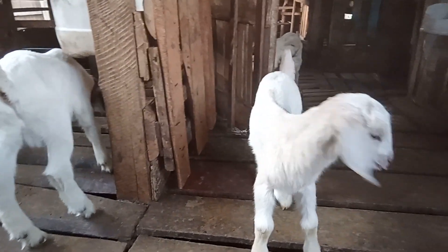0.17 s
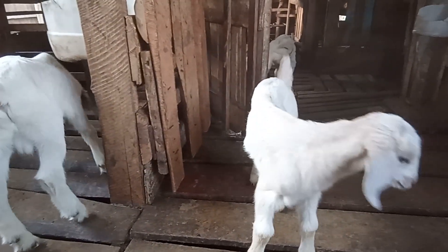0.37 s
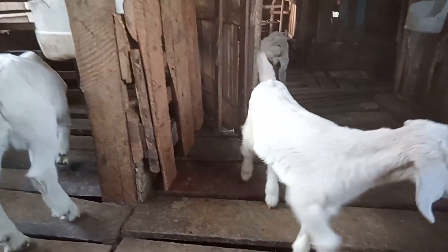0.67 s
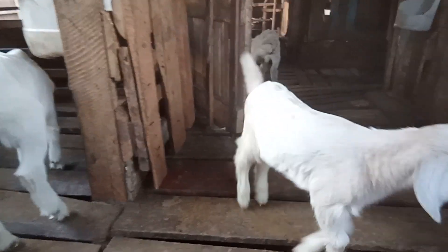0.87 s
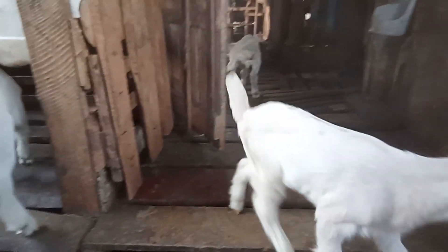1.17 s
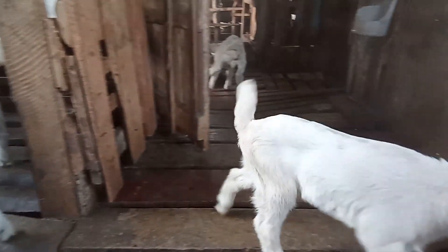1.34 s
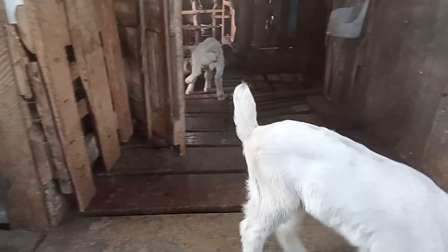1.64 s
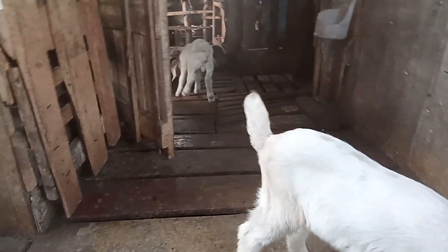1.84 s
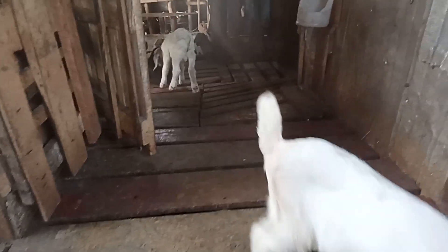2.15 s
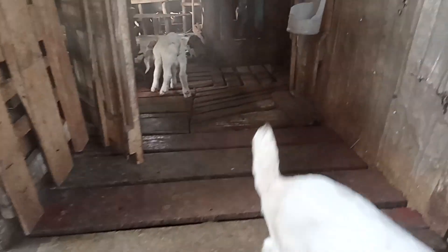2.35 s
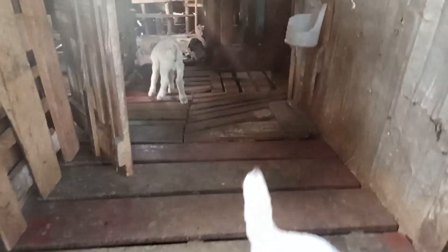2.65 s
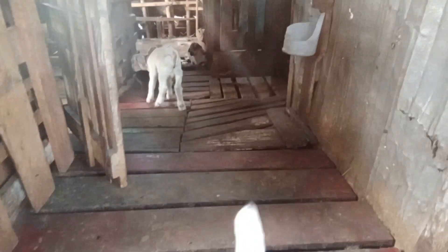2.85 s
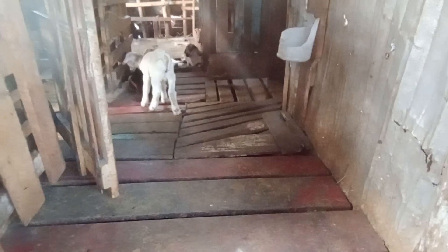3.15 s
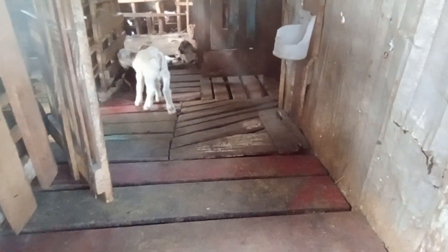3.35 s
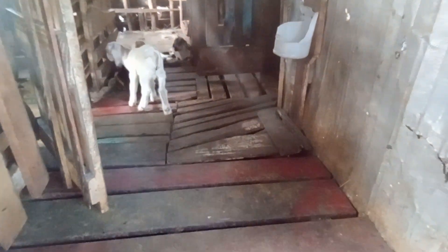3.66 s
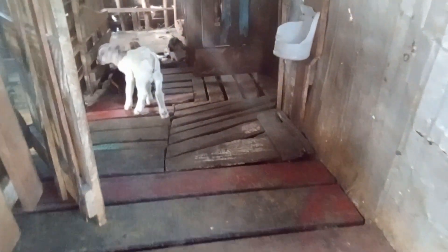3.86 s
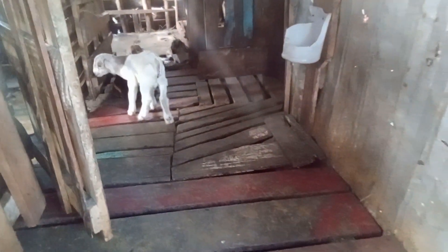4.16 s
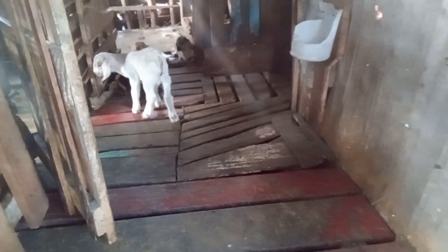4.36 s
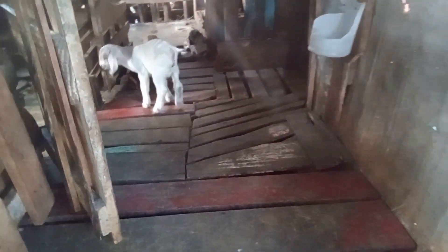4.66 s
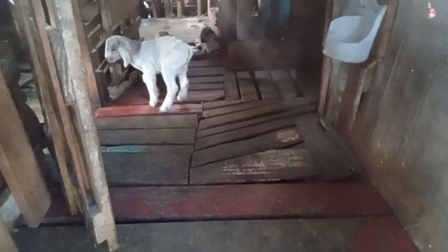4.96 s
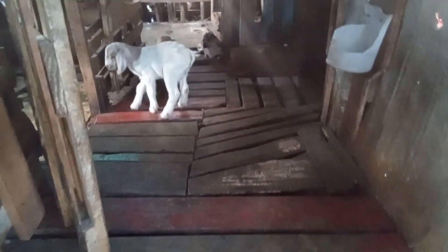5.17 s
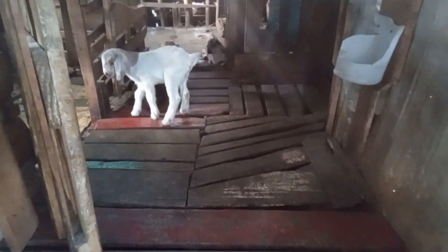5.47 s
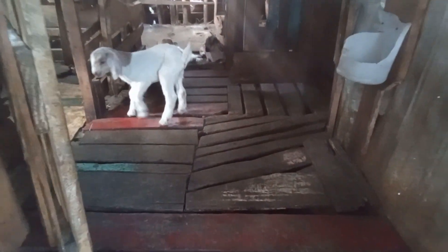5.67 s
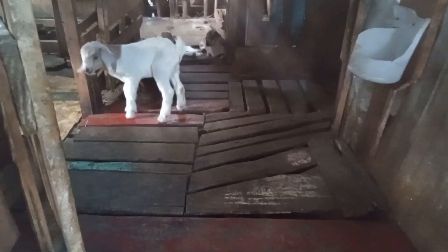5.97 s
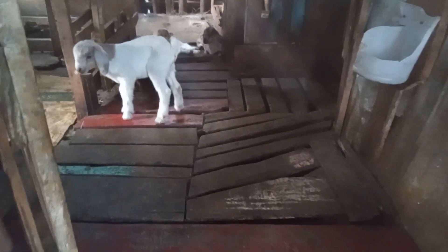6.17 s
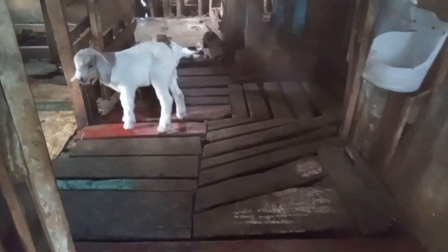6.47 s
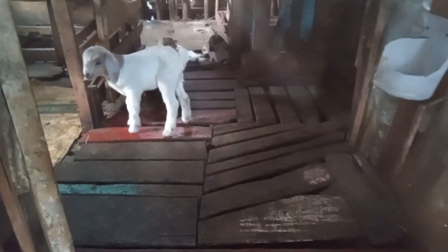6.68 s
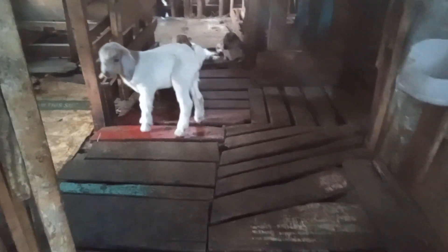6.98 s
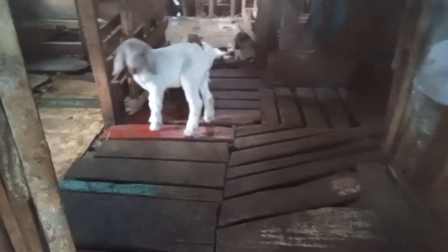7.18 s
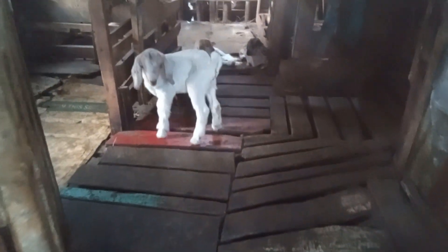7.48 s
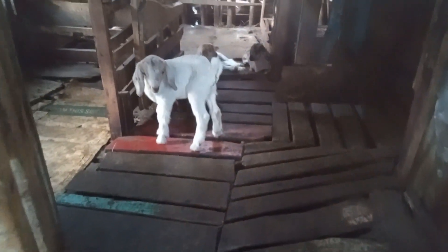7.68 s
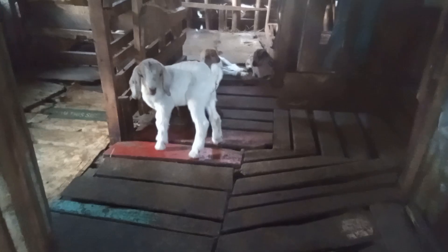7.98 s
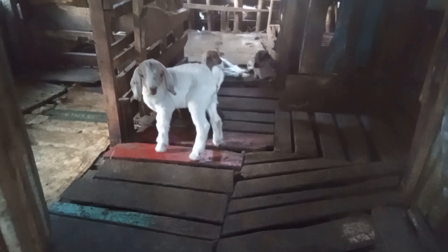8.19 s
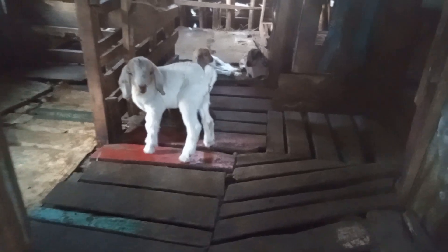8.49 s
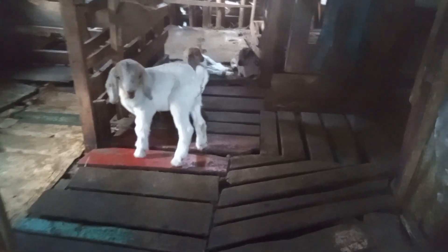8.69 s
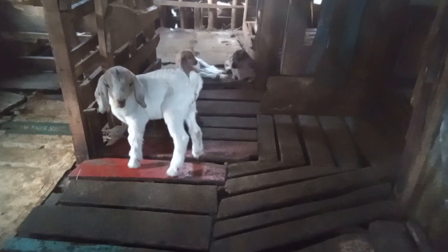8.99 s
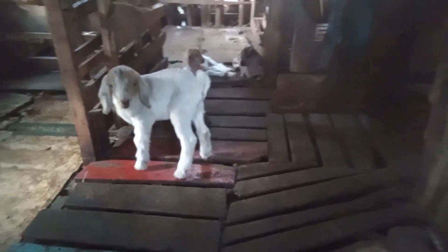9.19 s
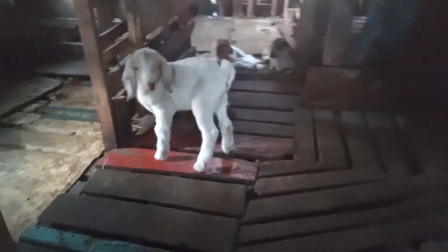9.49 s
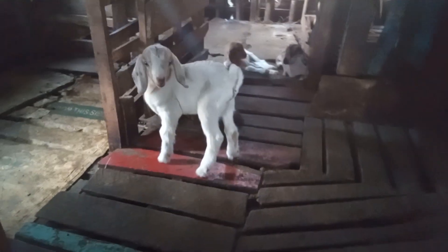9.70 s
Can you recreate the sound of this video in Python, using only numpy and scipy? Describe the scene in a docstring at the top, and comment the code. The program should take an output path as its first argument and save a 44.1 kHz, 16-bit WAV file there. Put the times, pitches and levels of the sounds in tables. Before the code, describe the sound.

Close single-channel pickup of small hooves on a slatted wooden floor. Light ticks and a few firm clacks lead to a fast run of dry, sharp taps, loudest around the middle. Afterwards steps become uneven, with low pallet thumps, short rasping slides and a last small cluster of clicks. Behind lie a soft rumble, faint hum and thin insect-like hiss in a small barn.

```python
"""Goats on loose pallets

Young goats walk about on loose wooden pallets in a small plank barn. Taps are sharp pulses that ring
slat and pallet modes, with a short tail of decaying noise bands. Thuds strike the low modes three times.
Scuffs are swells of uneven grit; squeaks, short rasps and one 2 kHz knock are narrow to wide noise at a
steady or gliding pitch. Behind them: a low rumble, a faint hum and a thin insect-like hiss."""
import sys
import numpy as np
from scipy import signal
from scipy.fft import rfft, irfft, next_fast_len
from scipy.io import wavfile

SR = 44100
rng = np.random.default_rng(int(sys.argv[2]) if len(sys.argv) > 2 else 0)


def generate_wav(signal):
    """Clip the signal to [-1, 1] and save it as 16-bit WAV at the path in sys.argv[1]."""
    frames = np.transpose(np.atleast_2d(signal))
    scaled = np.clip(frames, -1, 1) * 32767
    pcm = np.round(scaled).astype(np.int16)
    wavfile.write(sys.argv[1], SR, pcm)


def nominal_scale(level):
    """Amplitude ratio for a level in decibels (scalar or array-like)."""
    x = np.asarray(level, float) / 20
    return 10 ** x


N = 434385  # samples

# hoof taps: (time [s], nominal level [dB], pallet boom re level [dB], slat knock re level [dB],
# hardness [dB/octave])
TAPS = [(0.004, -34, -37, -37, 0), (0.011, -35, -37, -42, -1.5), (0.022, -31, -37, -35, 0),
        (0.442, -57.5, -21, -27, 14), (0.693, -34, -22, -25, -6.5), (0.844, -43.5, -18, -11, -4),
        (0.872, -45.5, -18, -3, 9), (1.069, -72, -30, -40, 18), (1.148, -36.5, -16, -15, -7.5),
        (1.242, -21, -29, -19.5, -3), (1.383, -17.5, -29, -18, -1.5), (1.571, -16.5, -17.5, -14.5, 1.5),
        (1.694, -34, -14, -13.5, -8), (1.931, -20.5, -25, -22.5, -2), (2.048, -44.5, -30, -27, 14),
        (2.279, -34.5, -35, -11, -2), (2.318, -41, -31, -15, -7.5), (2.606, -51, -18, -12, 5),
        (2.841, -39, -16, -21, -6), (2.918, -32, -31, -36, 2.5), (3.075, -19, -35, -32, -2.5),
        (3.225, -34.5, -16, -32, 6), (3.254, -19.5, -27, -38, 0.5), (3.318, -21.5, -24, -36, -2.5),
        (3.345, -21, -11, -21, -2.5), (3.363, -19, -16, -6.5, -8), (3.513, -38, -36, -30, 4),
        (3.528, -13, -49, -33, 1), (3.54, -20.5, -29, -32, -3.5), (3.567, -15, -21, -35, -2.5),
        (3.633, -15.5, -27, -27, -1.5), (3.68, -13.5, -29, -31, -0.5), (3.71, -16.5, -32, -34, -3),
        (3.74, -18.5, -21, -24, -3), (3.78, -12.5, -31, -31, -2), (3.819, -12.5, -26.5, -40, -1.5),
        (3.867, -14.5, -29, -32, -2), (3.934, -20.5, -22, -25, -4), (4.062, -10, -29, -42, -1),
        (4.129, -11, -27, -42, -1), (4.177, -12.5, -30, -30, -1), (4.253, -16, -28, -37, -4),
        (4.279, -10.5, -26, -35, -0.5), (4.367, -8.5, -32.5, -33, -0.5), (4.385, -8, -37, -33, -1.5),
        (4.545, -33.5, -16, 2, -9.5), (4.615, -10.5, -26, -24, -1), (4.644, -7, -26, -28, 0),
        (4.784, -13, -8, -2.5, -1.5), (4.965, -17, -10.5, -16, -3), (5.088, -34.5, -16, -14, 1.5),
        (5.177, -21, -22.5, -17.5, -2.5), (5.511, -29.5, -17, -30, 8.5), (5.564, -9, -31, -27, -0.5),
        (5.583, -9, -32, -38, -0.5), (5.821, -9, -24, -30.5, -0.5), (5.972, -9, -21.5, -32, 0),
        (6.078, -10.5, -30, -30, 0), (6.129, -9, -22, -37, -0.5), (6.276, -38, -7, -28, 1),
        (6.303, -31.5, -30, -21, 0.5), (6.865, -37.5, -17, -9, -3), (7.328, -22.5, -10, -1.5, -3),
        (7.564, -31, -8, -9.5, -3.5), (7.618, -26, -3.5, -7.5, -4), (7.669, -38.5, 2, -14, -3.5),
        (7.784, -17.5, -19, -12, -4.5), (7.945, -18, -17, -21, 0.5), (8.35, -35, -17, -24, -2.5),
        (8.54, -49.5, -22, -32, 6.5), (8.971, -25.5, -16.5, -26, -3), (9.026, -12.5, -25, -21, 1.5),
        (9.177, -16.5, -18.5, -24.5, 0), (9.257, -12.5, -41, -29, 0.5), (9.368, -41.5, 6.5, -7, -3.5),
        (9.411, -26.5, -7, -12.5, 1), (9.516, -48, 6, 9, -9.5), (9.633, -32, -27, -13, -5.5),
        (9.66, -33.5, -11, -10, -2)]
# weight coming down softly: (time of first touch [s], nominal level [dB], knock re level [dB])
THUDS = [(0.77, -49.5, 4), (1.878, -43.5, -10), (2.084, -50.5, 10), (2.209, -46.5, 6.5), (2.791, -47.5, -3),
         (4.517, -38, -7), (5.631, -31, 3.5), (6.877, -37, 2.5), (7.348, -37, 6), (7.412, -32, 5.5),
         (7.626, -50, -8), (7.737, -44, -20), (7.79, -26, -10), (9.149, -43, -6), (9.289, -37.5, 1),
         (9.746, -44.5, 2)]
# hooves sliding on wood: (time of crest [s], swell [s], fade [s], grit level [dB], brightness [dB])
SCUFFS = [(0.014, 0.054, 0.079, -55, -2.5), (0.08, 0.14, 0.24, -54, 6), (0.703, 0.023, 0.093, -49.5, 1.2),
          (0.918, 0.14, .04, -59.5, -2.5), (1.876, 0.046, 0.098, -57.5, 7), (2.0, .05, 0.28, -61, 2),
          (2.086, .025, 0.13, -53, 1), (2.216, 0.13, 0.1, -51, 2.5), (2.284, 0.017, 0.085, -52.5, 0.5),
          (2.88, 0.18, 0.36, -58.5, 8), (2.962, .04, .085, -43.5, 1.8), (3.26, 0.0036, 0.0064, -36, -4),
          (3.282, .02, .055, -35.5, 1), (3.372, .008, 0.048, -44.5, -15), (3.52, 0.2, .03, -53.5, 9.5),
          (3.968, 0.043, 0.05, -42.5, 0.5), (4.224, 0.089, 0.13, -44, -4), (4.3, .01, .05, -59, -2.5),
          (4.35, .045, 0.027, -42.5, 4), (4.551, 0.047, 0.096, -46, -1.5), (4.69, .05, 0.2, -47.5, 1.5),
          (4.77, 0.076, 0.036, -63, 14), (4.825, 0.039, 0.071, -40.5, -2.5), (5.14, 0.041, .06, -58, -7),
          (5.181, 0.039, 0.015, -38.5, 1.5), (5.52, 0.014, 0.089, -34.5, 4),
          (5.764, 0.028, 0.076, -42.5, -4.5), (5.822, 0.007, 0.036, -59, -11), (6.25, .01, 0.015, -57, 8),
          (6.314, 0.088, 0.028, -51, 4.5), (6.795, 0.023, 0.25, -53, .3), (7.006, 0.11, 0.091, -54, 3.5),
          (7.17, 0.0064, 0.071, -51, -0.5), (7.28, 0.1, 0.2, -47.5, 1.7), (7.534, 0.022, 0.04, -42, 2.5),
          (8.022, 0.11, 0.14, -48, 5.5), (8.263, 0.019, .11, -39, 3.3), (8.37, 0.061, 0.095, -53, -1.5),
          (8.872, .04, 0.08, -43.5, 7.1), (9.068, 0.032, 0.066, -33.5, 12), (9.154, 0.027, 0.077, -34.5, 5),
          (9.44, .01, 0.11, -53.5, 1), (9.74, 0.11, 0.18, -62, 0), (9.804, 0.057, 0.047, -48, 3)]
# hoof squeaks, short coloured rasps and one 2 kHz knock:
# (time [s], length [s], first pitch [Hz], last pitch [Hz], width [Hz], level at start [dB])
PITCHED_RUBS = [(0.008, 0.023, 1976, 1910, 350, -45.5), (0.054, 0.21, 2850, 2710, 546, -62),
                (1.994, 0.072, 2600, 2600, 300, -62), (2.808, 0.044, 3070, 3150, 300.4, -55),
                (2.859, 0.18, 3330, 3520, 382, -55), (3.08, .12, 3500, 3400, 303, -72),
                (8.0, .245, 3530, 3660, 300, -58.5), (8.255, .045, 3130, 3020, 253, -48.5),
                (8.256, 0.054, 990, 1002, 500, -45.5), (8.35, .04, 1854, 1860, 499, -57),
                (8.854, 0.044, 1365, 1165, 445, -46), (9.044, 0.061, 4250, 4440, 2420, -33.5)]
# ringing modes of slats, pallet and boards: (frequency [Hz], relative level [dB], t60 [s])
SLAT_MODES = [(904, 0.5, 0.049), (1033, 0, 0.065), (1090, -14.5, 0.046), (1314, 1.5, 0.029),
              (1796, 8, 0.021), (2022, -1, 0.05), (2560, -67, 0.049), (2880, -3, 0.093), (3142, 7.5, 0.029),
              (3475, 6.5, 0.02), (4057, 6, 0.018), (4436, 3, 0.037), (5850, -0.5, 0.056)]
BOOM_MODES = [(96, -20.5, 0.47), (141, -13.5, 0.24), (150, -2.5, 0.37), (168.7, -8.5, 0.45),
              (207, -4.5, 0.21), (240.4, -5.5, 0.2)]
KNOCK_MODES = [(269.3, -6, 0.16), (310, -3.5, 0.17), (358.3, -2.5, 0.17), (413.7, -8, 0.32),
               (448, -8.5, 0.11), (496, 0.5, 0.073), (560, -7, 0.3), (626, 5.5, 0.063), (778, -1.5, 0.12)]
# spectrum of a tap's first instant: (frequency [Hz], relative level [dB])
CRACK_SPECTRUM = [(400, -29.5), (1000, -12.5), (2000, -4), (3800, 0.5), (6000, -17), (8500, -25),
                  (10500, -30), (16000, -37)]
# spectrum of the barn tail: (frequency [Hz], relative level [dB])
TAIL_SPECTRUM = [(180, -20), (300, -17), (397, -15), (1000, -6), (1350, -3), (1590, -7), (1970, -3),
                 (2250, -5.5), (2740, -2.5), (4800, -9.5), (5760, -11.5), (8280, -10.5), (15500, -51.5)]
# decay of the barn tail: (frequency [Hz], t60 [s])
TAIL_T60 = [(300, 0.41), (700, 0.21), (1800, 0.16), (4800, 0.16), (12000, 0.15)]
# barn tail re tap level, as the goats move about: (time [s], level [dB])
BARN_SHARE = [(0, -22.5), (0.4, -21.5), (0.9, -21), (1.2, -15.5), (1.9, -24.5), (2.9, -20), (3.07, -24),
              (3.33, -19), (3.4, -19.5), (3.8, -23.5), (4.3, -23.5), (4.65, -21.5), (4.8, -15.5),
              (5.2, -16.5), (5.56, -16.5), (6.13, -16), (6.3, -19.5), (7.3, -18.5), (8.0, -16), (9.2, -21),
              (9.7, -17.5)]
# spectrum of hoof rubbing on wood: (frequency [Hz], relative level [dB])
RUB_SPECTRUM = [(180, -43), (300, 14), (590, -5.5), (1000, 1), (2000, -11), (2360, -6), (2650, -13),
                (4350, -1), (4960, 4.5), (5950, 5), (8420, 3.5), (11000, -17.5), (15500, -29)]
# spectrum of the background rumble: (frequency [Hz], relative level [dB])
AIR_SPECTRUM = [(21, -41), (35, -6), (60, -14), (75, -4.5), (162, -5), (249, -9.5), (375, -15.5),
                (564, -17.5), (1010, -20.5), (1920, -23.5), (2600, -23), (4680, -28), (6300, -27),
                (7210, -23), (8500, -26.5), (9550, -34), (12500, -46.5), (15800, -41)]

USUAL_PEAK_DB, DRIER_DB_PER_DB = -25, 0.18  # louder taps are nearer and drier
CRACK_DB, TAIL_LUCK_DB = 14, 1
SETTLE_S, SETTLE_LOSS_DB = 0.015, 6  # per further touch of a thud
SCUFF_DEPTH_DB, SCUFF_ROUNDING = 24.5, 0.81  # loss over one swell or fade; exponent of the crest
HOLLOW_DB, SIZZLE_DB = -4.5, -5  # low and high part re grit, before brightness
HOLLOW_HZ, HOLLOW_WANDER = 1050, 0.08
RUB_ATTACK_S, RUB_RELEASE_S = 0.0091, 0.025
RUB_FADE_DB, RUB_FLUTTER_DB = 5, 2.5
THIN_HZ = 403  # wider rasps flutter less
AIR_DB = -60.5
HUM_HZ, HUM_DB = 52.2, -72
HISS_HZ, HISS_WIDTH_HZ, HISS_DB = 7150, 600, -74
CUTOFF_HZ = 15950


def taps():
    """A faint tick through the wood, then the crack, its floor echo, the ringing modes and the barn."""
    tick_s, level_db, boom_db, knock_db, hardness = np.transpose(TAPS)
    share_db = np.interp(tick_s, *np.transpose(BARN_SHARE))
    tail_db = share_db - DRIER_DB_PER_DB * (level_db - USUAL_PEAK_DB)
    main_s = tick_s + 0.001108

    sharp = crack(main_s, level_db + CRACK_DB, hardness)
    sharp += crack(tick_s, level_db + 0.5, hardness + 3)
    sharp -= crack(main_s + 0.003, level_db + 1.6, hardness)  # floor echo

    flat_modes = [(hz, 0, t60_s) for hz, db, t60_s in SLAT_MODES]
    colour_db = [db + hardness * np.log2(hz / 2500) for hz, db, t60_s in SLAT_MODES]
    slats = strike(flat_modes, main_s, level_db + tail_db - 9, spread_db=3.5, colour_db=colour_db)

    boom = soften(strike(BOOM_MODES, main_s, level_db + boom_db + 3, spread_db=4.5), 0.0016)
    knock = soften(strike(KNOCK_MODES, main_s, level_db + knock_db - 3, spread_db=3.0), 0.00053)
    return sharp + slats + barn(main_s, level_db + tail_db, hardness) + loose(boom + knock)


def crack(times_s, db, hardness):
    """One sharp pulse, built in bands; a harder contact is brighter."""
    edges_hz = 400 * 2 ** np.arange(0, 5.6, 0.75)
    out = np.zeros(N)
    for lo, hi in zip(edges_hz, edges_hz[1:]):
        band_db = at_hz(CRACK_SPECTRUM, np.sqrt(lo * hi)) + hardness * np.log2(lo / 2000)
        out += band(clicks(times_s, db + band_db), lo, hi)
    return out


def barn(times_s, db, hardness):
    """Dense reflections as noise: after a blow each band swells briefly and dies at its own rate."""
    edges_hz = 420 * 2 ** np.arange(0, 5.4, 1 / 3)
    noise = coloured(N, TAIL_SPECTRUM), coloured(N, TAIL_SPECTRUM)
    luck = rng.normal(0, 1, (len(times_s), len(edges_hz)))
    out = np.zeros(N)
    for k, (lo, hi) in enumerate(zip(edges_hz, edges_hz[1:])):
        hz = np.sqrt(lo * hi)
        blow_db = db + hardness * np.log2(hz / 2500) + TAIL_LUCK_DB * luck[:, k]
        power = clicks(times_s, 2 * blow_db)
        r = nominal_scale(-2 * 60 / (at_hz(TAIL_T60, hz) * SR))  # power decay per sample
        decay = signal.lfilter([1], [1, -r], power)
        out += band(noise[k % 2], lo, hi) * np.sqrt(soften(decay, 0.000095))
    return out


def thuds():
    """Three weakening touches as the weight settles; slow contact reaches only the low modes."""
    first_s, level_db, knock_db = np.transpose(THUDS)
    touch = np.arange(3)
    gap_luck = rng.uniform(0.693, 1.3, (len(first_s), 3))
    times_s = np.ravel(first_s[:, None] + SETTLE_S * touch * gap_luck)
    touch_db = np.ravel(level_db[:, None] - SETTLE_LOSS_DB * touch)
    boom = strike(BOOM_MODES, times_s, touch_db - 6, spread_db=5.0)
    knock = strike(KNOCK_MODES, times_s, touch_db + np.repeat(knock_db, 3) - 7, spread_db=3.0)
    return loose(soften(boom + knock, 0.00044))


def strike(modes, times_s, db, spread_db, colour_db=None):
    """Modal ringing; every blow strikes each mode with a strength of its own."""
    luck = rng.normal(0, 1, (len(times_s), len(modes)))
    colour_db = np.zeros(len(modes)) if colour_db is None else colour_db
    out = np.zeros(N)
    for k, (hz, mode_db, t60_s) in enumerate(modes):
        blow_db = db + mode_db + colour_db[k] + spread_db * luck[:, k]
        out += (-1) ** k * ring(clicks(times_s, blow_db), hz, t60_s)
    return out


def ring(x, hz, t60_s):
    """Two-pole resonator: a unit click starts a decaying sine of height 1."""
    r, w = nominal_scale(-60 / (t60_s * SR)), 2 * np.pi * hz / SR
    return signal.lfilter([0, np.sin(w)], [1, -2 * r * np.cos(w), r * r], x)


def soften(x, contact_s):
    """A blow that lasts a while: two equal one-pole smears."""
    r = np.exp(-1 / (contact_s * SR))
    return signal.lfilter([(1 - r) ** 2], [1, -2 * r, r * r], x)


def loose(x):
    """Loose planks shake unevenly while they ring, and radiate no deep bass."""
    shaken = x * (1 + 0.25 * drift(60))
    return signal.sosfilt(signal.butter(2, 85, "high", fs=SR, output="sos"), shaken)


def scuffs():
    """Dense uneven grit under the sliding hoof; the slats ring along, hollow at a wandering pitch."""
    grit = coloured(N, RUB_SPECTRUM) * nominal_scale(2.0 * drift(400))
    slats = sum(nominal_scale(db) * ring(grit, hz, t60_s) for hz, db, t60_s in SLAT_MODES)
    grit = grit + 0.5 * rms_one(slats)
    wandering_hz = HOLLOW_HZ * (1 + HOLLOW_WANDER * drift(8.0))
    hollow = rms_one(band(grit, 670, 1070)) + 0.57 * narrow(wandering_hz, 250, 0)
    middle, sizzle = band(grit, 1750, 3590), band(grit, 6340, 21300)
    parts = np.array([rms_one(hollow), rms_one(middle), rms_one(sizzle)])

    t, power = np.arange(N) / SR, np.zeros((3, N))
    for crest_s, swell_s, fade_s, db, bright_db in SCUFFS:
        start, stop = int((crest_s - 3 * swell_s) * SR), int((crest_s + 3 * fade_s) * SR)
        near = slice(max(start, 0), stop)
        away = np.abs(t[near] - crest_s) / np.where(t[near] < crest_s, swell_s, fade_s)
        share_db = np.array([[HOLLOW_DB - bright_db], [0], [SIZZLE_DB + bright_db]])
        power[:, near] += nominal_scale(db + share_db - SCUFF_DEPTH_DB * away ** SCUFF_ROUNDING) ** 2
    return np.sum(parts * np.sqrt(power), axis=0)


def squeaks_and_rasps():
    """Squeaks, short rasps and one knock: narrow to wide noise at a steady or gliding pitch."""
    t, out = np.arange(N) / SR, np.zeros(N)
    flutter_db = RUB_FLUTTER_DB * drift(60)
    for start_s, length_s, first_hz, last_hz, width_hz, db in PITCHED_RUBS:
        end_s = start_s + length_s
        along = np.clip((t - start_s) / length_s, 0, 1)
        corners_s = [start_s - RUB_ATTACK_S, start_s, end_s, end_s + RUB_RELEASE_S]
        gate = np.interp(t, corners_s, [0, 1, 1, 0]) ** 2
        noise = pitched_noise(first_hz + (last_hz - first_hz) * along, width_hz, 0.2)
        level_db = db - RUB_FADE_DB * along + flutter_db * min(1, THIN_HZ / width_hz)
        out += noise * gate * nominal_scale(level_db)
    return out


def air():
    """Background noise: low lumpy rumble, a faint wavering hum and a steady band of hiss."""
    rumble = coloured(N, AIR_SPECTRUM) * nominal_scale(AIR_DB + 1.0 * drift(12))
    hum = pitched_noise(np.full(N, HUM_HZ), 3.9, 4.5) * nominal_scale(HUM_DB)
    edges_hz = HISS_HZ - HISS_WIDTH_HZ / 2, HISS_HZ + HISS_WIDTH_HZ / 2
    hiss = rms_one(band(rng.standard_normal(N), *edges_hz))
    return rumble + hum + hiss * nominal_scale(HISS_DB + 1.0 * drift(2.6))


def rms_one(x):
    """Scale to rms 1."""
    return x / np.sqrt(np.mean(x ** 2) + 1e-20)


def at_hz(points, hz):
    """Read a table at a frequency, linear in log frequency."""
    table_hz, value = np.transpose(points)
    return np.interp(np.log(hz), np.log(table_hz), value)


def band(x, low_hz, high_hz):
    """Butterworth band-pass."""
    return signal.sosfilt(signal.butter(2, [low_hz, high_hz], "band", fs=SR, output="sos"), x)


def coloured(size, spectrum):
    """Noise with the given spectrum, rms 1."""
    length = next_fast_len(size)
    hz = np.maximum(np.fft.rfftfreq(length, 1 / SR), 1)
    shaped = rfft(rng.standard_normal(length)) * nominal_scale(at_hz(spectrum, hz))
    return rms_one(irfft(shaped, length)[:size])


def drift(rate_hz):
    """Random knots at the given rate, joined by straight lines, rms 1."""
    knots = rng.standard_normal(int(N / SR * rate_hz) + 2)
    return rms_one(np.interp(np.arange(N) * rate_hz / SR, np.arange(len(knots)), knots))


def pitched_noise(pitch_hz, width_hz, steady):
    """A band of noise around a steady or moving pitch, plus a share of pure tone, rms 1."""
    phase = 2 * np.pi * np.cumsum(pitch_hz) / SR
    return rms_one((steady + drift(width_hz)) * np.sin(phase) + drift(width_hz) * np.cos(phase))


def clicks(times_s, db):
    """Single-sample impulses over a negligible floor."""
    out = np.full(N, 1e-18)
    index = np.clip((np.asarray(times_s) * SR).astype(int), 0, N - 1)
    np.add.at(out, index, nominal_scale(db))
    return out


def narrow(pitch_hz, width_hz, steady):
    """Pitched noise of small width."""
    return pitched_noise(pitch_hz, width_hz, steady)


def scene():
    """Sum of all layers, one channel."""
    return (taps() + thuds() + scuffs() + squeaks_and_rasps() + air())[None]


def low_pass(x):
    """Removes everything above the highest recorded frequency."""
    return signal.sosfilt(signal.butter(12, 16500, fs=SR, output="sos"), x)


def record(dry):
    """The microphone drops the deepest bass; the top is cut."""
    cut = signal.sosfilt(signal.butter(6, 42, "high", fs=SR, output="sos"), dry)
    cut = signal.sosfilt(signal.cheby2(12, 22, CUTOFF_HZ, fs=SR, output="sos"), cut)
    return low_pass(cut)


dry = scene()
out = record(dry)
generate_wav(out)
```